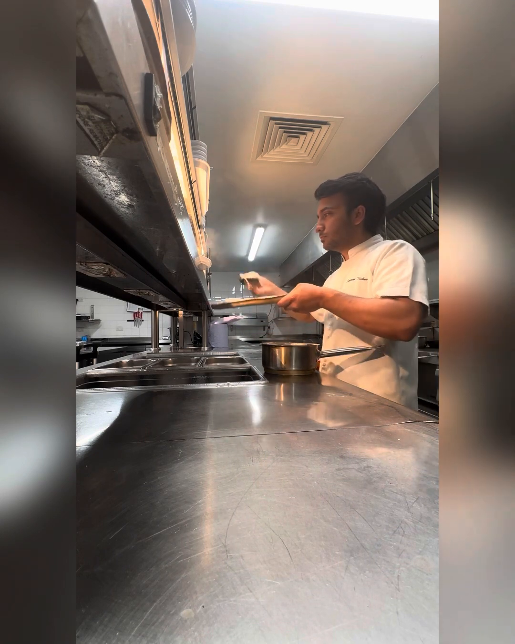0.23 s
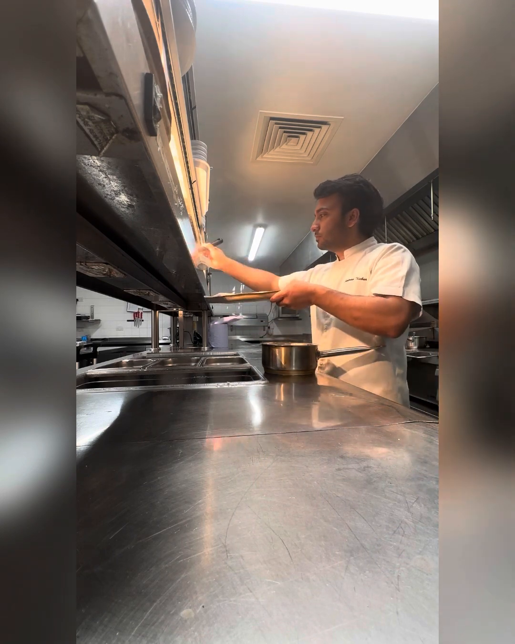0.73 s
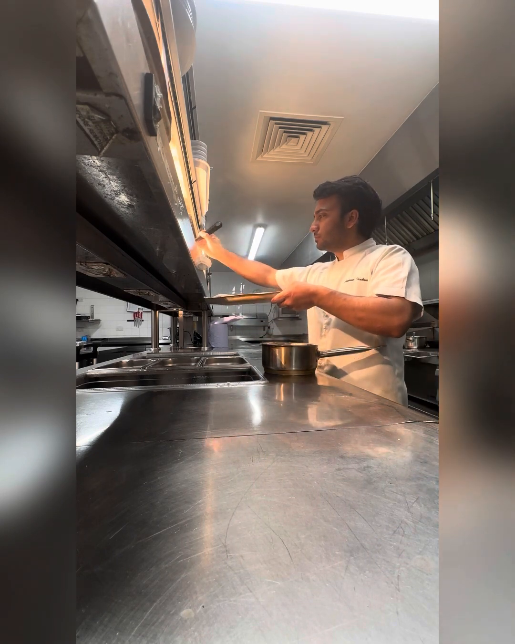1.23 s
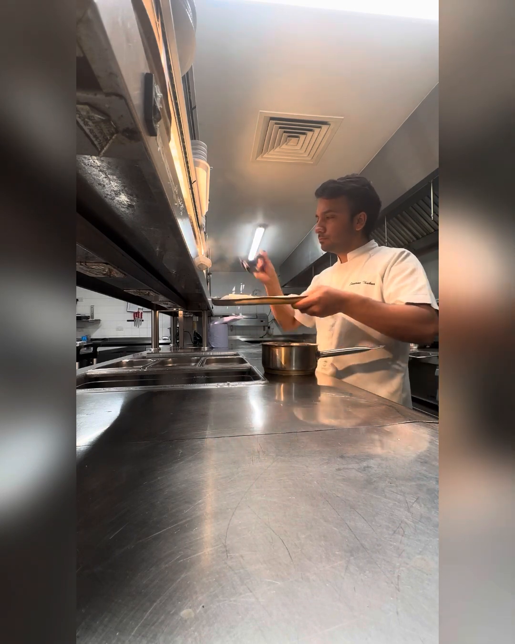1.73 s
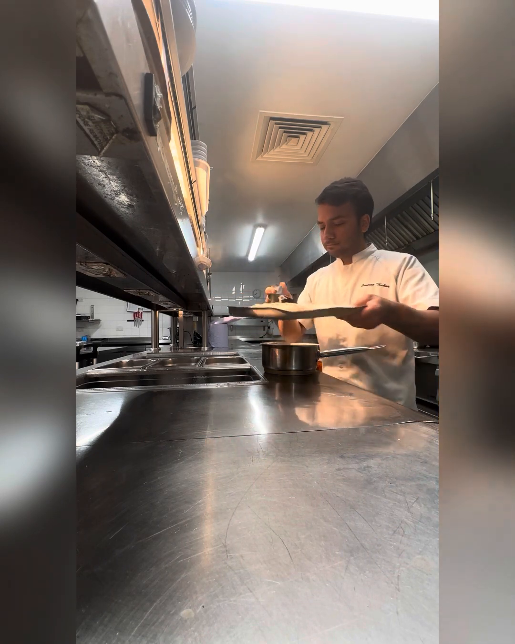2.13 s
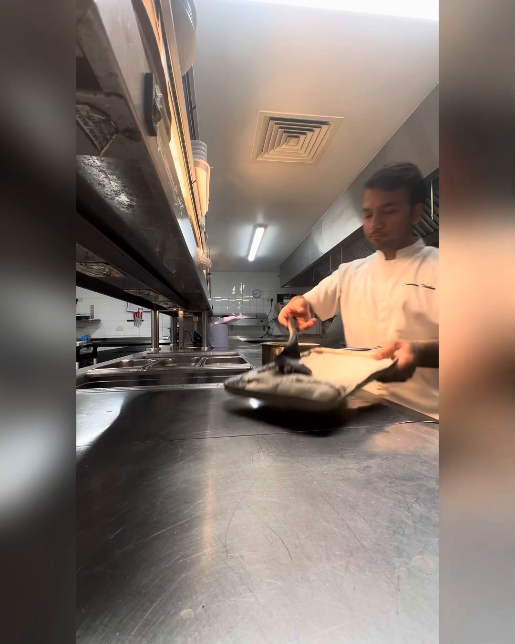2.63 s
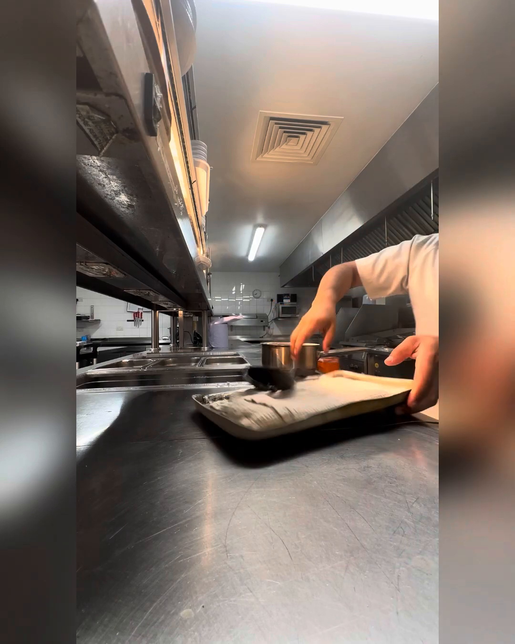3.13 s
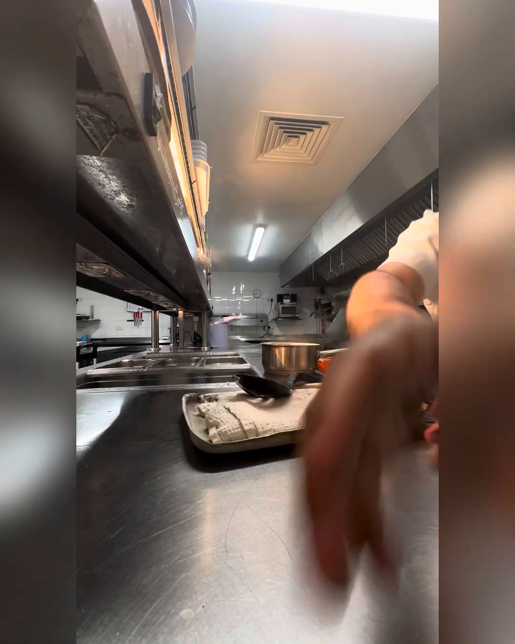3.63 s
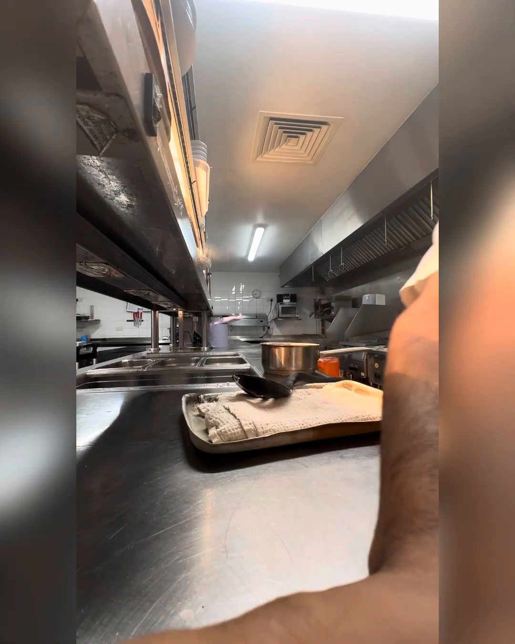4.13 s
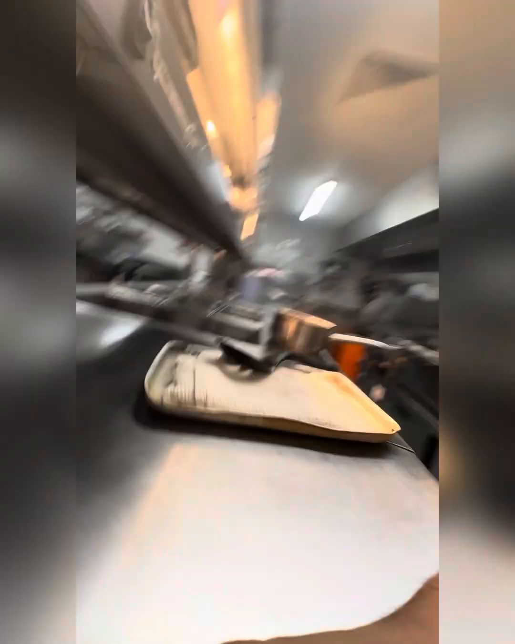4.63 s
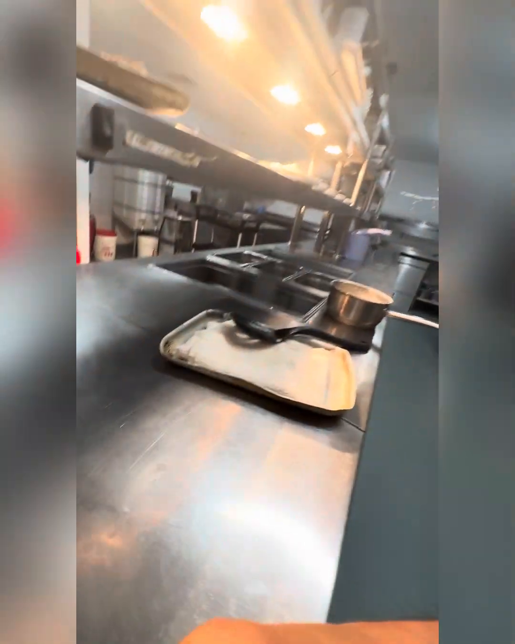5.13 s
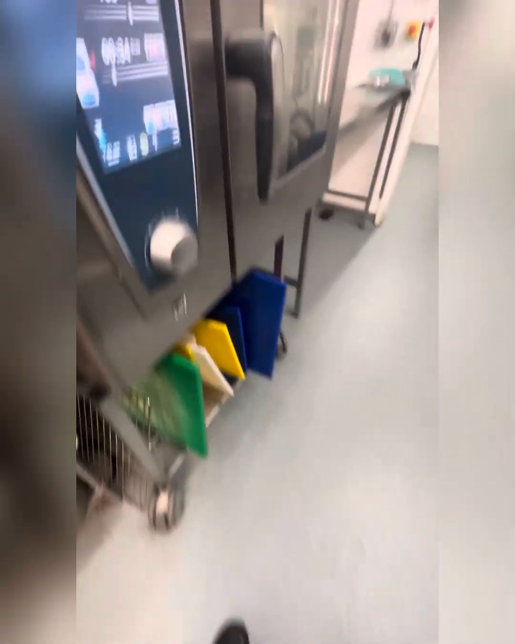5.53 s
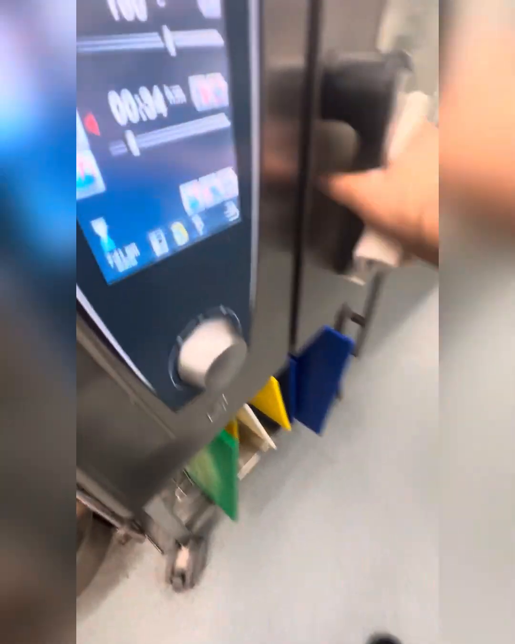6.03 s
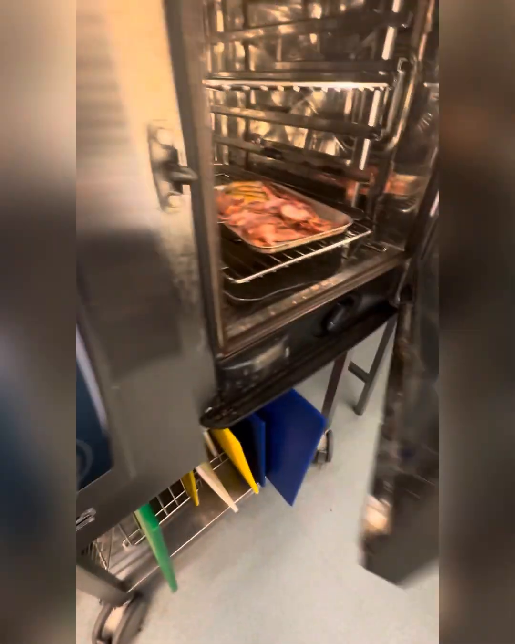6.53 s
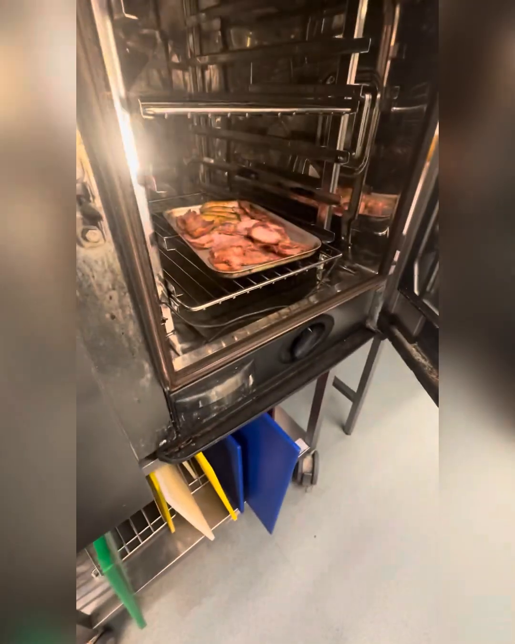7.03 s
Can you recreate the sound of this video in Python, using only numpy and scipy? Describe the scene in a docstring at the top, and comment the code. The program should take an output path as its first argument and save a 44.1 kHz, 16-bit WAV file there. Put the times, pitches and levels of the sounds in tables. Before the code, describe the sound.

In a hard steel and tile kitchen, an extractor hood hums low with soft air hiss. Distant tongs clink and slide on a shelf. Nearer, a baking tray bangs on the counter, a utensil clatters onto it and its edge drops. A hand bumps the handheld microphone. An oven handle ticks, its latch snaps twice, and the opening door releases a roaring, hissing rush that slackens.

```python
"""An extractor hood drones in a steel kitchen: shaped turbulent noise with fluttering motor tones.
Tongs clink and slide on a shelf, then a baking tray and its utensils clatter on the steel counter:
noise bursts excite damped modes. The listener turns to an oven; its handle ticks, its latch snaps and the
opening door lets out a rush of hot air, louder shaped noise with a howl and a swelling low note, which slackens."""
import sys
import numpy as np
from scipy import signal
from scipy.fft import rfft, irfft, next_fast_len
from scipy.io import wavfile
from scipy.ndimage import uniform_filter1d, map_coordinates

SR = 44100
rng = np.random.default_rng(int(sys.argv[2]) if len(sys.argv) > 2 else 0)


def wav_out(sig):
    """Save sig, one row per channel (or a flat mono array), as 16-bit PCM at SR to the path in sys.argv[1]."""
    wavfile.write(sys.argv[1], SR, np.round(np.clip(np.atleast_2d(sig).T, -1, 1) * 32767).astype(np.int16))


N = 320600

# The hood's noise at two microphone ports. Each row: frequency in Hz, coherence from 0 to 1,
# phase by which the left port leads in radians.
HOOD_PORTS = [(150, .99, 0), (300, .92, -.2), (480, .75, -.55), (860, .75, -1.9), (1250, .7, -2.8),
              (1750, .25, -1), (2400, .5, -3.3), (3300, .15, -2.2), (4100, .4, -.2), (5000, .45, -3),
              (5900, .38, .3), (7000, .2, -1.3), (8800, .35, -1.5), (10200, .98, -3.14)]
# The oven's noise at the same ports. Each row: frequency in Hz, coherence from 0 to 1,
# phase by which the left port leads in radians.
OVEN_PORTS = [(150, .99, 0), (340, .95, -.15), (520, .75, -1.3), (750, .6, -2.9), (1100, .75, -4.8),
              (1700, .85, -6.1), (2100, .75, -6.2), (3000, .35, -8.2), (3900, .5, -6.1), (5200, .15, -7),
              (6000, .6, -7), (7500, .6, -8.4), (9200, .5, -7.8), (10400, .995, -9.42)]
GRIP_S = 4.349  # moment of the hand's touch; the steady noise thins at the same time


def tray():
    """Impact excitation: the tray lands, a utensil is laid on it, then the tray's raised end drops."""
    # Blows of the tray, damped as it settles. Each row: start in seconds, contact level in dB, clack centre
    # in Hz, its sharpness q, ring level in dB, counter thud level in dB, factor on the ring's length.
    tray_hits = [(2.705, -7.5, 3100, 1.13, -10, -17.5, 0.8), (2.7645, -20, 2320, 1.3, -27, -28, .8),
                 (3.338, -16.5, 3000, .55, -22.5, -53, 1), (3.417, -13, 2020, .65, -22, -27, .56),
                 (3.4404, -10, 2890, 0.47, -15.5, -8.5, 0.39), (3.4455, -14, 1210, .7, -13, -22, .5),
                 (3.4505, -12.5, 2200, .7, -13.5, -11.5, .55), (3.461, -21, 1390, .8, -18, -26, .6),
                 (3.493, -20, 2190, .68, -21, -21, .38)]
    # Blows of the utensil on the tray. Each row: start in seconds, contact level in dB, clack centre
    # in Hz, its sharpness q, ring level in dB, counter thud level in dB, factor on the ring's length.
    utensil_hits = [(3.1085, -8.5, 1200, 1.1, -6, -37, .75), (3.1394, -9, 4060, .8, -14, -21, 1),
                    (3.1535, -19, 2410, .7, -25, -27, .9), (3.174, -10, 1900, 0.66, -20, -28, 0.76),
                    (3.1806, -11.5, 3020, .89, -18, -15, 0.81), (3.2015, -20.5, 3000, 1, -21, -31, .9),
                    (3.281, -23.5, 1010, 1.4, -31, -45, .8)]
    # Modes of the tray. Each row: frequency in Hz, relative level in dB, t60 in seconds before that factor.
    tray_modes = [(607, 1, 0.34), (927, -7, .12), (1240, -7.5, 0.16), (1553, -4, .1), (1990, -2.5, 0.12),
                  (2220, -8, .12), (2370, -5.5, 0.091), (2770, -0.5, .08), (2910, -7, .12),
                  (3090, 0.5, 0.088), (3250, -1.5, 0.089), (3580, -7, 0.14), (4020, -6, 0.12),
                  (4320, 0.5, 0.054), (5800, -16.5, 0.17), (7100, -16, .1), (8100, -17, .14)]
    # Modes of the utensil on the tray. Each row: frequency in Hz, relative level in dB,
    # t60 in seconds before that factor.
    utensil_modes = [(689, -6, .07), (830, -4, .05), (965, 4, .045), (1170, 0, .07), (1287, -1, .11),
                     (1480, -6, .06), (1707, -3, .07), (2329, -8, .12), (2447, -1, .15), (2713, -6, .08),
                     (2867, -7, .12), (3134, -12, .18), (4090, -13, .13), (4620, -19, .12)]
    out = np.zeros((2, N))
    for hits, modes in ((tray_hits, tray_modes), (utensil_hits, utensil_modes)):
        for s, *contact in hits:
            add(out, s, blow(modes, *contact))
    return out


def blow(modes, db, centre_hz, q, ring_db, thud_db, sustain):
    """Modal excitation: a contact clacks, bounces once, rings the metal and booms the counter."""
    # Broad resonances of the tray's sheet, colouring the clack. Each row: frequency in Hz, gain in dB.
    sheet = [(500, 0), (1350, 1), (1750, -2), (2450, 2.5), (3000, 2), (3600, -5), (4200, 3), (5100, -3),
             (6500, -1), (8000, 1.5), (10000, 0)]
    # Boom modes of the hollow counter. Each row: frequency in Hz, relative level in dB, t60 in seconds.
    counter_modes = [(73, -0.5, 0.33), (151, -8, 0.36), (232.2, 4.5, 0.18), (291, -4.5, 0.24),
                     (348, -6, .22), (422, -1, 0.2), (490.5, -4, .2), (614, -6, 0.17), (692, -2, .18),
                     (797, -4, 0.15), (940, -5, 0.14)]
    light_thud_hz, octave_down_db = 510, -12.5  # a thud at this level has sunk an octave
    rebound_s, rebound_loss_db = 0.017, 14.5

    hardness = np.log2(centre_hz / 3000)  # octaves above a 3 kHz clack
    t60 = 0.029 / 2 ** (0.26 * hardness)  # harder clacks die sooner
    thud_hz = light_thud_hz / (1 + amp(thud_db - octave_down_db) ** 4)

    strike = filtered(clack(centre_hz, t60, q, width=0.89), lambda hz: amp(along(sheet, hz)))
    contact = amp(db) * strike + wide_burst(db - 7.5 + 7 * hardness, t60=0.025)
    rebound = amp(db - rebound_loss_db) * clack(centre_hz, t60, q, width=0.98)
    add(contact, rebound_s * rng.uniform(.8, 1.2), rebound)

    # The tray's floor gives a dull, longer knock, strongest relative to soft contacts.
    flex = clack(centre_hz=800, t60=.1, q=.9, width=.7)
    body = amp(db - 13.0 - 1.2 * hardness) * flex

    sustained_modes = [(hz, level, life * sustain) for hz, level, life in modes]
    metal_ring = ring(sustained_modes, scatter_db=1.5, spread=1.2, rise=.0004)
    metal = amp(ring_db) * focused(metal_ring, centre_hz, q=.22)
    counter_ring = ring(counter_modes, scatter_db=1.5, spread=.35, rise=.004)
    boom = amp(thud_db) * focused(counter_ring, thud_hz, q=0.56)
    return in_room(contact + body, wet_db=-11.0) + metal + boom


def rattle():
    """Repeated micro-impacts: loose utensils chatter on the tray in small, uneven, fading ticks."""
    # Bouts of chatter. Each row: start in seconds, length in seconds, starting level in dB,
    # middle of the tick centres in Hz.
    bouts = [(3.118, .02, -23, 1300), (3.146, .09, -20, 4300), (3.359, .04, -22, 2800),
             (3.422, .02, -21, 2000), (3.445, .05, -18.5, 2200)]
    ticks_per_s, fall_db, scatter_db = 110, 9, 2.5
    out = np.zeros((2, N))
    for s, length_s, db, centre_hz in bouts:
        for late in np.arange(0, length_s, 1 / ticks_per_s):
            jitter, size, pitch = rng.standard_normal(3)
            tick = clack(centre_hz * 2 ** (.3 * pitch), t60=.018, q=.9, width=.8)
            tick_db = db - fall_db * late / length_s + scatter_db * size
            add(out, s + late + .25 * jitter / ticks_per_s, amp(tick_db) * tick)
    return in_room(out, wet_db=-4.0)


def tongs():
    """Impact and friction: light steel clinks further off, answered by the room, and short slides."""
    # Clinks on the shelf. Each row: start in seconds, level in dB, centre in Hz, t60 in seconds.
    clinks = [(0.881, -34.5, 5880, 0.056), (1.0425, -28.5, 5300, 0.051), (1.053, -28, 1850, 0.034),
              (1.117, -34, 6030, 0.021)]
    # Slides along the shelf. Each row: start in seconds, level in dB, t60 in seconds.
    slides = [(.884, -36.5, 0.49), (1.046, -32.5, 1.13)]
    # Spectrum of the rubbed shelf. Each row: frequency in Hz, relative spectral density in dB per Hz.
    scrape_spectrum = [(150, -8), (240, 1), (330, -4.5), (580, 8), (900, 1.5), (1400, 1), (2000, -3),
                       (2600, -3.5), (6000, -7.5), (9500, -15), (15000, -24)]
    out = np.zeros((2, N))
    for s, db, centre_hz, t60 in clinks:
        clink = amp(db) * clack(centre_hz, t60, q=0.73, width=0.9)
        shelf = amp(db - 3.0) * clack(centre_hz=1210, t60=0.096, q=0.99, width=0.56)
        add(out, s, in_room(clink + shelf, wet_db=-18.0) + wide_burst(db + 4.5, t60=0.015))
    scrape = rush(scrape_spectrum, HOOD_PORTS, patchy_db=1)
    strokes = sum(amp(db) * swell(s, rise_s=0.005, hold_s=0.012, t60=t60) for s, db, t60 in slides)
    return out + scrape * strokes


def latch():
    """Impulsive release: the turning handle ticks, the catch snaps and knocks the door, the seal lets go."""
    # Contacts of the latch, close by. Each row: start in seconds, reference level of the snap in dB,
    # centre in Hz, t60 in seconds, ring of the catch in dB, door knock in dB.
    snaps = [(6.1045, -11, 3500, .017, -10.5, -6.5), (6.172, -27, 4200, .011, -27, -48),
             (6.207, -29, 3200, .037, -31, -52), (6.3196, -11.5, 2100, .05, -26, -11.5)]
    # Modes of the steel catch. Each row: frequency in Hz, relative level in dB, t60 in seconds.
    catch_modes = [(1900, -8, .03), (2350, -5, .03), (3050, -3, .024), (3600, 4, .021), (3760, 4, .02),
                   (5600, -5, .025), (6800, -7, .025)]
    # Modes of the oven door's panel. Each row: frequency in Hz, relative level in dB, t60 in seconds.
    door_modes = [(345, 1, .065), (400, 6, .065), (555, -8, .07), (810, -8, .04), (1070, -10, .05)]
    handle_s, handle_step_s = 6.033, .0108
    handle_db, handle_grows_db, nudge_db = -27.5, 0.8, -28  # the ticks grow, their nudges on the door do not
    out = np.zeros((2, N))
    for s, db, centre_hz, t60, catch_db, knock_db in snaps:
        snap = amp(db - 4.5) * clack(centre_hz, t60, q=.7, width=.58)
        bright = wide_burst(db - 9.5, t60=.01)
        catch = amp(catch_db) * ring(catch_modes, scatter_db=2, spread=.7, rise=.0004)
        knock = amp(knock_db) * ring(door_modes, scatter_db=1.5, spread=.2, rise=0.0005)
        add(out, s, in_room(snap + bright + catch + knock, wet_db=-16.5))
    for k in range(4):
        tick_db = handle_db + k * handle_grows_db
        tick = amp(tick_db) * clack(centre_hz=2600, t60=0.034, q=0.52, width=1.0)
        nudge = amp(nudge_db) * ring(door_modes, scatter_db=2, spread=.2, rise=.0005)
        add(out, handle_s + k * handle_step_s, in_room(tick + nudge, wet_db=-12.0))
    return out


def oven():
    """Turbulent jet noise: the casing rumbles; the opening door lets out roar, hiss and the chamber's drone."""
    # Spectrum of the fan's roar. Each row: frequency in Hz, relative spectral density in dB per Hz.
    roar_spectrum = [(110, -23), (150, 3), (220, -1), (290, 2.5), (375, 5.5), (450, -5.5), (525, 4),
                     (620, -6), (720, 4), (800, 8.5), (950, 1), (1100, -1), (1380, -2), (1580, -11),
                     (1720, -8.5), (1850, -13), (2300, -12), (2600, -14), (3000, -21.5), (4500, -45)]
    # Hot air leaving the oven. Each row: frequency in Hz, relative spectral density in dB per Hz.
    steam_spectrum = [(1200, -15), (1700, 2.5), (2600, 6.5), (3300, 5.5), (4200, 2), (5000, 0.5), (6500, 0),
                      (9000, -5), (11000, -15.5), (12200, -16), (15500, -7)]
    # The chamber's resonance. Each row: frequency in Hz, relative spectral density in dB per Hz.
    drone_spectrum = [(60, -38), (85, -11), (95, 6.5), (102, 6), (112, -5), (150, -51), (400, -120)]
    # Rumble of the casing. Each row: frequency in Hz, relative spectral density in dB per Hz.
    casing_spectrum = [(100, -21), (150, 6), (250, 7), (500, -10.5), (900, -30), (3000, -100)]
    draught_spectrum = [(35, -36), (65, 16.0), (130, 15.0), (220, -44.5), (600, -100)]  # (Hz, dB per Hz)

    flow = through_door(db=-19, shut_loss_db=17.5, swell_s=0.5, fall_db_per_s=20.5)
    roar = flow * rush(roar_spectrum, OVEN_PORTS, patchy_db=2)
    draught = flow * rush(draught_spectrum, OVEN_PORTS, patchy_db=-0.5)
    hiss_gain = through_door(db=-31.5, shut_loss_db=45.5, swell_s=0.28, fall_db_per_s=25)
    hiss = hiss_gain * rush(steam_spectrum, OVEN_PORTS, patchy_db=1.2)
    drone_gain = through_door(db=-20, shut_loss_db=9, swell_s=3.3, fall_db_per_s=7)
    drone = drone_gain * rush(drone_spectrum, OVEN_PORTS, patchy_db=0.5)
    casing_gain = amp(-30) * ramp(start_s=5.43, length_s=0.53)  # heard once the listener faces the oven
    casing = casing_gain * rush(casing_spectrum, OVEN_PORTS, patchy_db=1)
    return panned(roar, left_db=-0.5) + hiss + drone + draught + casing


def through_door(db, shut_loss_db, swell_s, fall_db_per_s):
    """Transmission through an aperture: a gain that nears, swells with the door and sinks as the fan slows."""
    open_s, coast_s = 6.026, 6.726
    approach_s, approach_db_per_s = 7.2, 3.5  # grows louder until the listener stands before the oven
    t = np.arange(N) / SR
    far_db = approach_db_per_s * np.maximum(approach_s - t, 0)
    leak = amp(-shut_loss_db)
    gap = leak + (1 - leak) * ramp(open_s, swell_s) ** 1.25
    return gap * amp(db - far_db - fall_db_per_s * np.maximum(t - coast_s, 0))


def howl():
    """Cavity resonance: a hollow two-note howl, two narrow peaks of noise, flares in the roar and fades."""
    # Spectrum of the howl. Each row: frequency in Hz, relative spectral density in dB per Hz.
    howl_spectrum = [(850, -43), (1020, -11), (1105, 3.5), (1190, -13), (1275, 1.5), (1400, -22.5),
                     (1700, -49)]
    band = rush(howl_spectrum, OVEN_PORTS, patchy_db=2)
    return amp(-29.5) * swell(6.71, rise_s=.03, hold_s=.13, t60=.8) * band


def low_note():
    """Amplitude modulation: five brief swells of a low note near 99 Hz, at set times and levels."""
    # Swells of the note. Each row: time of the peak in seconds, level in dB.
    peaks = [(6.48, -13), (6.61, -9), (6.734, -12.5), (6.98, -11), (7.185, -10.5)]
    half_length_s, note_hz = 0.033, 99.1
    t = np.arange(N) / SR
    envelope = sum(amp(db) * np.exp(-((t - s) / half_length_s) ** 2) for s, db in peaks)
    return envelope * np.sin(2 * np.pi * note_hz * t + 0.92 * wobble(8.1))


def whine():
    """Tonal fan noise: the oven's fan sings faintly on one wavering note as the listener comes near."""
    level_db, = curves([(5.1, -80), (5.45, -38.5), (5.9, -45), (6.3, -38), (6.7, -61)])
    tone = np.sin(2 * np.pi * 492 * np.arange(N) / SR + 0.17 * wobble(7.3))
    return amp(level_db) * tone


def grip():
    """Near-field contact: a hand takes hold by the microphone with a dry tick, soft rustle and low bump."""
    skin_spectrum = [(1000, -40), (1400, -5), (2600, 2), (5000, -3),
                     (6500, -4), (9500, -6), (15000, -16)]  # (Hz, dB per Hz)
    body_spectrum = [(40, -25), (90, 0), (150, -3), (300, -30), (900, -120)]  # (Hz, dB per Hz)
    tick = np.zeros((2, N))
    add(tick, GRIP_S, amp(-21.5) * clack(centre_hz=2400, t60=.01, q=.7, width=.5))
    skin = rush(skin_spectrum, HOOD_PORTS, patchy_db=2)
    body = rush(body_spectrum, HOOD_PORTS, patchy_db=1)
    rustle = amp(-47.5) * swell(GRIP_S, rise_s=0.023, hold_s=0.059, t60=0.4) * skin
    bump = amp(-22) * swell(GRIP_S + 0.037, rise_s=0.018, hold_s=0.026, t60=0.25) * body
    return tick + rustle + bump


def hood():
    """Broadband flow noise: duct rumble, air, baffle whistle and thin hiss, dulled as the listener turns."""
    # Rumble of the duct. Each row: frequency in Hz, relative spectral density in dB per Hz.
    duct_spectrum = [(30, -48), (42, -6), (62, -5), (80, -6), (104, 4.5), (125, -4), (142, 4), (165, -8.5),
                     (200, -1.5), (218, -2.5), (238, 0.5), (275, -11.5), (380, -13), (600, -67)]
    # Rushing air. Each row: frequency in Hz, relative spectral density in dB per Hz.
    air_spectrum = [(200, -47), (300, -10), (370, 3), (420, 3), (485, -0.5), (565, 2.5), (630, -4),
                    (800, -2), (1100, -17.5), (1800, -67.5)]
    # Whistle through the baffles. Each row: frequency in Hz, relative spectral density in dB per Hz.
    baffle_spectrum = [(500, -18), (950, 8), (1400, 2), (2100, -1), (2600, 2), (3000, -4.5), (3350, 1),
                       (3800, -15.5), (6000, -60)]
    # Thin hiss. Each row: frequency in Hz, relative spectral density in dB per Hz.
    hiss_spectrum = [(1500, -45.5), (3000, 3), (4100, 4), (4800, 1), (6100, 2), (7200, -4), (9000, -8),
                     (11000, -23), (12300, -19.5), (15500, -11.5)]
    turn_from_s, turn_to_s = 3.34, 5.4  # the listener turns from the hood
    turned = ramp(turn_from_s, turn_to_s - turn_from_s)
    draught_db = .35 * wobble(2)

    def gain(db, turned_loss_db):
        """Directional loss: a level that falls with the turn and wavers with the draught."""
        return amp(db - turned_loss_db * turned + draught_db)

    duct = gain(-26.5, turned_loss_db=1.24) * rush(duct_spectrum, HOOD_PORTS, patchy_db=-0.2)
    air = gain(-37, turned_loss_db=4.3) * rush(air_spectrum, HOOD_PORTS, patchy_db=1.5)
    baffle = gain(-45, turned_loss_db=3.1) * rush(baffle_spectrum, HOOD_PORTS, patchy_db=1.4)
    hiss = gain(-51, turned_loss_db=5.1) * rush(hiss_spectrum, HOOD_PORTS, patchy_db=1.4)
    return panned(duct, left_db=2) + panned(air, left_db=-1) + baffle + hiss


def motors():
    """Rotational tones: fan motors flutter in level and phase, fading as the listener turns to the oven."""
    # Motor tones. Each row: frequency in Hz, level before the fade in dB, flutter in dB,
    # lean to the left in dB.
    motor_tones = [(49.6, -31, 1.5, 0), (100.3, -32, 3, 1.5), (237, -39, 2, 4)]
    t = np.arange(N) / SR
    fade_db, = curves([(5.1, -2), (5.5, -9), (7.2, -15)])
    tones = np.zeros((2, N))
    for hz, db, flutter_db, left_db in motor_tones:
        level = amp(db + flutter_db * wobble(9))
        phase_flutter = 0.15 * flutter_db * wobble(10)
        tones += panned(level * np.sin(2 * np.pi * hz * t + phase_flutter), left_db)
    return tones * amp(fade_db)


def dipped(air):
    """Band rejection: sound common to both channels thins near 950 Hz; later the whole level dips briefly."""
    common = filtered(air.mean(axis=0), lambda hz: np.exp(-(np.log2((hz + 1) / 950) / .5) ** 4))
    thinning = swell(GRIP_S, rise_s=.008, hold_s=.06, t60=.2)
    dip = swell(5.324, rise_s=.008, hold_s=.012, t60=.015)
    return (air - thinning * common) * amp(-8 * dip)


def reflected(x):
    """Comb filtering: early reflections off nearby steel give steady noise a fine, fixed ripple."""
    echo_db, longest_s = -18.5, .02
    delays = longest_s * rng.uniform(.2, 1, size=6)

    def response(hz):
        """Interference: the direct sound plus delayed copies, which exist only above 600 Hz."""
        echoes = np.exp(-2j * np.pi * np.outer(delays, hz)).sum(axis=0)
        return 1 + amp(echo_db) * (hz > 600) * echoes

    return filtered(x, response)


def in_room(x, wet_db):
    """Reverberation: a sound plus its own diffuse, decaying answer from the tiled and steel walls."""
    # Decay of the room. Each row: frequency in Hz, t60 in seconds.
    room_t60 = [(100, .4), (500, 0.39), (2000, 0.37), (6000, 0.73), (10000, 0.21), (16000, 0.07)]
    hz, t, z = signal.stft(rng.standard_normal((2, SR // 2)), SR, nperseg=256)
    envelope = amp(-60 * t / along(room_t60, hz)[:, None]) * (1 - np.exp(-t / 0.00096))
    tail = signal.istft(z * envelope, SR, nperseg=256)[1]
    echo = signal.fftconvolve(x, tail / np.linalg.norm(tail[0]), axes=1)
    return x + amp(wet_db) * echo[:, :x.shape[1]]


def rush(spectrum, ports, patchy_db):
    """Turbulence: shaped noise of partial coherence at two ports, patchy in gain; their mean has rms 1."""
    z = signal.stft(rng.standard_normal((2, N)), nperseg=512)[2]
    field = uniform_filter1d(rng.standard_normal(z.shape[1:]), size=5, axis=0)
    field = uniform_filter1d(field, size=12, axis=1)
    pair = signal.istft(z * amp(patchy_db * field / rms(field)), nperseg=512)[1][:, :N]
    f, alike, lead = np.transpose(ports)

    def mid_side(hz):
        """Coherence: shares of common and opposed noise that give the wanted likeness."""
        angle = np.arccos(np.clip(np.interp(hz, f, alike), 0, 1)) / 2
        return amp(along(spectrum, hz)) * [np.cos(angle), np.sin(angle)]

    mid, side = filtered(pair, mid_side)
    left_right = np.array([mid + side, mid - side])
    air = filtered(left_right, lambda hz: np.exp(np.outer([.5j, -.5j], np.interp(hz, f, lead))))
    return air / rms(air.mean(axis=0))


def ring(modes, scatter_db, spread, rise):
    """Modal decay: damped sines at new strengths; spread scatters their phase between the ports."""
    t = np.arange(SR // 2) / SR
    hz, db, t60 = np.transpose(modes)[:, :, None]
    size, phase, skew = rng.standard_normal((3, len(modes), 1))
    fade = amp(db + scatter_db * size - 60 * t / t60) * (1 - np.exp(-t / rise))
    angle = 2 * np.pi * hz * t + np.pi * phase
    out = np.array([(fade * np.sin(angle + side * spread * skew)).sum(axis=0) for side in (.5, -.5)])
    return out / np.linalg.norm(amp(db))


def clack(centre_hz, t60, q, width):
    """Impact noise: fast-dying noise stands for a crowd of modes around a centre set by hardness."""
    t = np.arange(SR // 2) / SR
    mid, side = rng.standard_normal((2, len(t)))
    burst = np.array([mid + width * side, mid - width * side])
    burst = focused(focused(burst, centre_hz, q), centre_hz, q)
    return burst / rms(burst) * amp(-60 * t / t60) * (1 - np.exp(-t / 0.0003))


def wide_burst(db, t60):
    """Stereo decorrelation: a very wide, bright, short noise burst, nearly opposite in left and right."""
    return amp(db) * clack(centre_hz=10300, t60=t60, q=0.12, width=21.0)


def focused(x, centre_hz, q):
    """Resonant band-pass: energy gathers around a centre, the harder the contact the higher; rms is kept."""
    pole = np.tan(np.pi * min(centre_hz, SR / 3) / SR) * 2
    b, a = signal.bilinear([pole / q, 0], [1, pole / q, pole ** 2])
    y = signal.lfilter(b, a, x)
    return y * rms(x) / rms(y)


def swell(start_s, rise_s, hold_s, t60):
    """Exponential decay: an envelope of attack, hold, then a steady fall in dB."""
    late = np.maximum(np.arange(N) / SR - start_s - rise_s - hold_s, 0)
    return ramp(start_s, rise_s) * amp(-60 * late / t60)


def ramp(start_s, length_s):
    """Linear transition: a steady move from 0 to 1."""
    return np.clip((np.arange(N) / SR - start_s) / length_s, 0, 1)


def wobble(rate):
    """Slow random modulation: a smooth curve through rate random knots a second."""
    knots = rng.standard_normal(int(N * rate / SR) + 4)
    return map_coordinates(knots, [np.arange(N) * rate / SR])


def curves(rows):
    """Linear interpolation: one value per sample for each column after the time in seconds."""
    s, *cols = np.transpose(rows)
    return [np.interp(np.arange(N) / SR, s, c) for c in cols]


def along(points, hz):
    """Logarithmic frequency scale: (Hz, value) points interpolated on a log axis."""
    f, v = np.transpose(points)
    return np.interp(np.log(hz + 1), np.log(f + 1), v)


def filtered(x, response):
    """Linear filtering: the spectrum of x times a response of frequency."""
    n = x.shape[-1]
    m = next_fast_len(n + 8192)  # padding keeps the tail from wrapping round
    return irfft(rfft(x, m) * response(np.fft.rfftfreq(m, 1 / SR)), m)[..., :n]


def panned(x, left_db):
    """Interaural level difference: lean a sound to the left."""
    return x * amp([[left_db / 2], [-left_db / 2]])


def add(track, s, sound):
    """Superposition: mix a sound into a track at time s in seconds."""
    part = track[..., round(s * SR):][..., :sound.shape[-1]]
    part += sound[..., :part.shape[-1]]


def amp(db):
    """Logarithmic level: decibels to amplitude gain."""
    return 10 ** (np.asarray(db) / 20)


def rms(x):
    """Effective value: root mean square."""
    return np.sqrt(np.mean(x ** 2) + 1e-20)


def scene():
    """Superposition: the handling and the oven over the hood's ventilation."""
    ventilation = dipped(reflected(hood()) + motors())
    oven_air = whine() + oven() + howl() + low_note()
    handling = tray() + rattle() + tongs() + grip() + latch()
    return ventilation + oven_air + handling


def record(dry):
    """Saturation and band limit: the microphone clips the hardest peaks and keeps nothing from 15850 Hz up."""
    return filtered(np.clip(dry, -.88, .88), lambda hz: hz < 15850)


dry = scene()
out = record(dry)
wav_out(out)
```